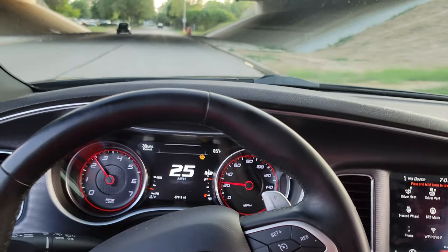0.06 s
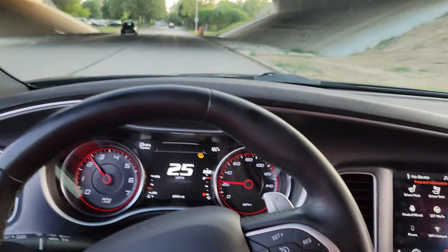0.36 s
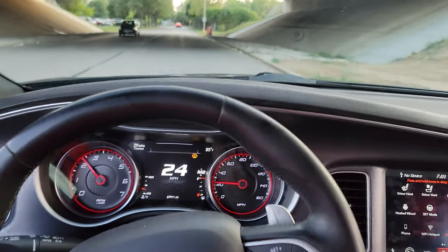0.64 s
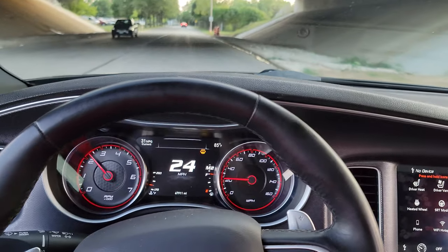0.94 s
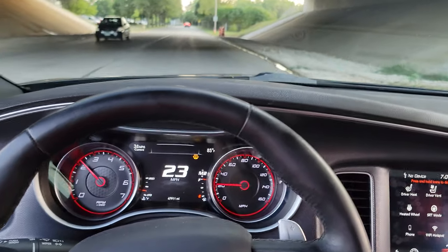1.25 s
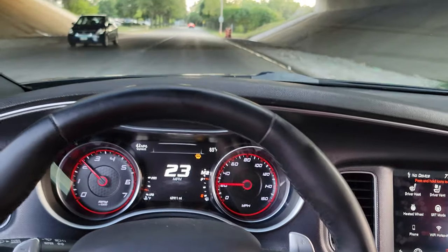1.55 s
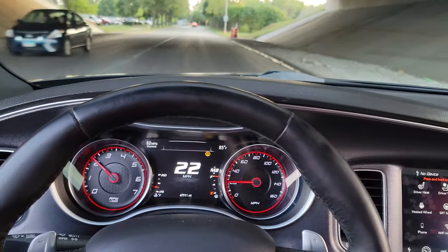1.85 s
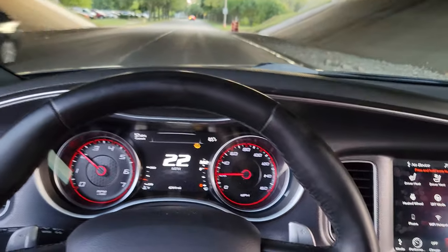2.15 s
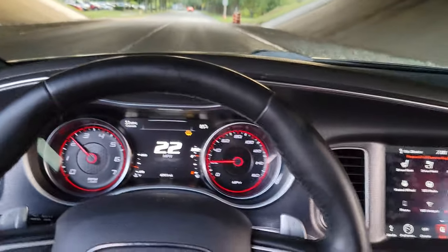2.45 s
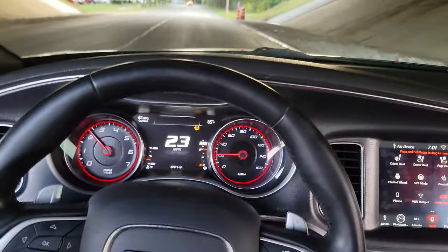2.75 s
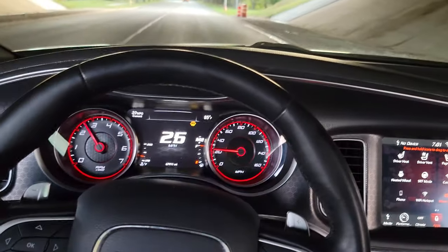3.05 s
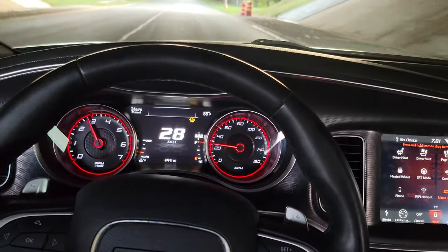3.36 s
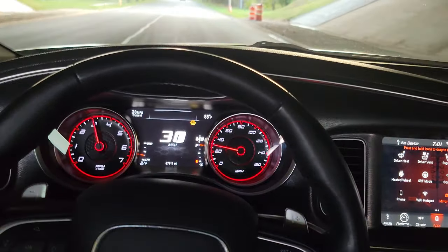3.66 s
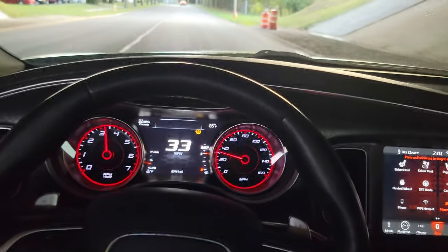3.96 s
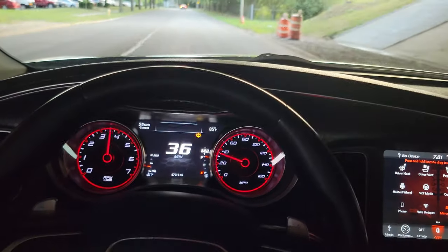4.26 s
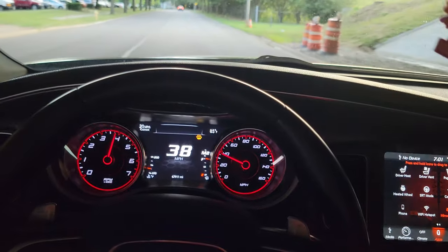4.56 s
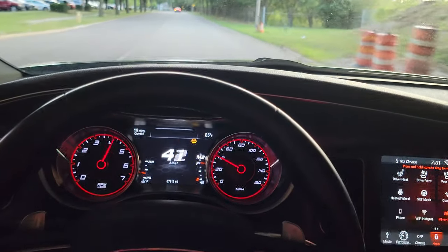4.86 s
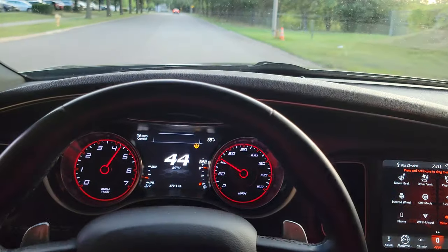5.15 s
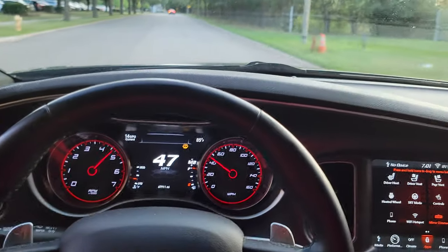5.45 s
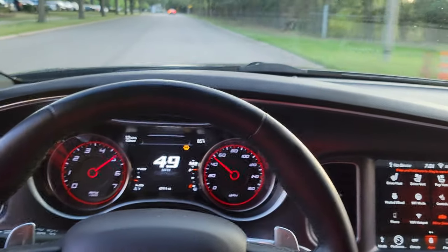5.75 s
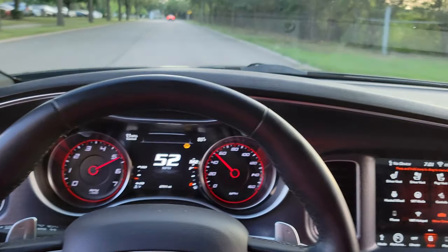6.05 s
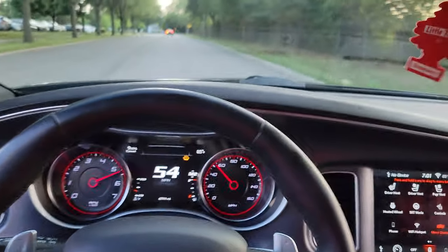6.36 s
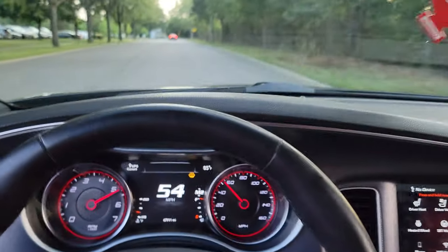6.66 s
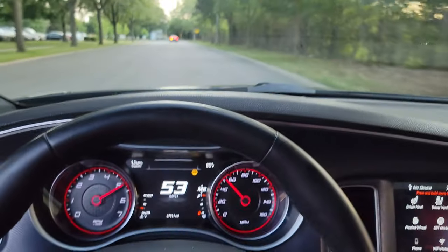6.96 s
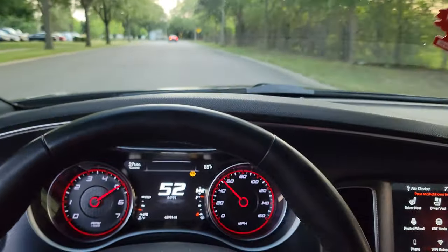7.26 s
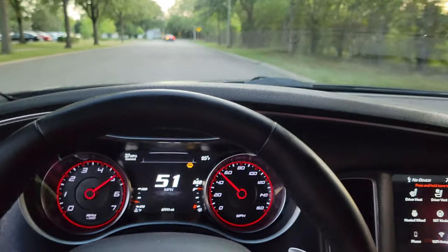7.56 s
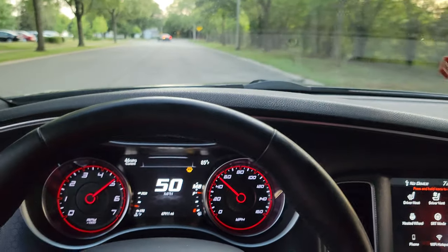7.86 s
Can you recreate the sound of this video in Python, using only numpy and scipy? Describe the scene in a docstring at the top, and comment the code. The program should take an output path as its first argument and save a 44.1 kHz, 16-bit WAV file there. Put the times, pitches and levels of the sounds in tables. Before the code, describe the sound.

From the driver's seat, exhaust pops give way to a rising engine roar, followed by another burst of bangs and a high drone.

```python
"""Inside a loud V8 saloon

The car coasts under a bridge, popping, with one cylinder chuffing. It pulls with a rough growl from 2400
to 5400 rpm, then lifts off with more bangs and a high drone. The firing cylinders make the engine's note;
the exhaust's pops shake the cabin trim into a short buzz. The road rumbles underneath."""
import sys
import numpy as np
from scipy import signal
from scipy.fft import rfft, irfft, next_fast_len
from scipy.io import wavfile

SR = 44100
rng = np.random.default_rng(int(sys.argv[2]) if len(sys.argv) > 2 else 0)


def materialize(psi):
    """Save the field psi as 16-bit PCM at rate SR to the path in sys.argv[1].

    A 1-D psi becomes a single channel; in a 2-D psi each row is a channel.
    """
    bounded = np.clip(np.atleast_2d(psi).T, -1, 1)
    quanta = np.round(bounded * 32767).astype(np.int16)
    wavfile.write(sys.argv[1], SR, quanta)


N = 348831
TIME = np.arange(N) / SR
SLOW_HZ, FAST_HZ = 63.8, 78.2   # engine speeds between which the note changes over

# engine speed (a coast, a flare, a long pull, a stumble, a slow fall): t/s, crankshaft turns/Hz
ENGINE_SPEED = [(0.0, 41.85), (2.12, 36.06), (2.2, 39.2), (2.3, 41.4), (2.38, 39.0), (2.65, 40.29),
                (3.05, 43.86), (4.55, 66.06), (5.55, 81.3), (6.0, 87.87), (6.15, 89.76), (6.45, 88.95),
                (6.55, 85.73), (6.7, 87.93), (7.0, 85.55), (7.55, 83.85), (7.91, 81.77)]
# the pedal: t/s, throttle (0 shut, 1 open)
PEDAL = [(2.15, 0), (2.33, .15), (2.6, .9), (3.4, 1), (6.47, 1), (6.58, 0)]
# loudness of the exhaust note: t/s, level/dB
NOTE_LEVEL = [(0, -15.5), (2.271, -16), (2.38, -21), (2.65, -11), (3.4, -11), (4.3, -15), (5.1, -14),
              (6.1, -15), (6.5, -18), (7.0, -16.5), (7.91, -15)]
# loudness of the sounds of hard pulling: t/s, growl/dB, bark/dB
LOAD_LEVELS = [(2.3, -55.5, -55), (2.6, -22, -37), (2.85, -20.5, -28.5), (3.3, -19, -24), (4.2, -16.5, -27),
               (5.1, -15.5, -27), (5.6, -21.5, -27.5), (6.0, -22.5, -36), (6.5, -42, -41)]
# exhaust pops, with a few faint chuffs and trim rattles: t/s, level/dB, thump offset/dB, buzz offset/dB
POPS_AND_RATTLES = [(0.038, -15, 1, -36), (0.066, -14, 3, -31), (0.159, -12.5, 1.5, -35),
                    (0.271, -28.5, 1, -43), (0.292, -9, -2, -31), (0.329, -23.5, 13.5, -41),
                    (0.467, -27, 6.5, -41.5), (0.506, -17.5, 5.5, -43), (0.57, -9, 0, -19.5),
                    (0.716, -28.5, 2, -40.5), (0.739, -8, -2, -20.5), (0.765, -15, -9, -42),
                    (0.84, -28, 3.5, -16), (0.863, -22, 9.5, -40), (0.942, -7.5, -2.5, -27),
                    (0.971, -27, -10, -32), (1.043, -30.5, -10, -15), (1.129, -11.5, 2, -24),
                    (1.159, -36.5, -2.5, -14), (1.257, -14, 0, -34), (2.194, -23.5, 11, -50),
                    (6.645, -21, -1.5, -21), (6.722, -20, -2.5, -24), (6.746, -11, -2, -23),
                    (6.8, -11, -5, -24), (6.822, -13, -0.5, -18), (6.842, -17, 0, -24),
                    (6.866, -11.5, -11.5, -22), (6.907, -15, 3, -14), (6.951, -14, -8.5, -25),
                    (7.021, -15.5, -11, -24)]
# tone colours of a crack, rushing air and buzzing trim: f/Hz, level/dB
CRACK_COLOUR = [(200, -2), (350, 2.5), (650, 1), (1000, -1), (1500, -2.5), (2300, -16), (3200, -26.5),
                (7000, -45), (16000, -58.5)]
RUSH_COLOUR = [(1500, 2), (3000, 5.5), (3600, 1.5), (4400, 3), (5500, 1.5), (7200, -2.5), (8300, -14.5),
               (16000, -26.5)]
BUZZ_COLOUR = [(3000, -10), (6000, 4), (8500, -4.5), (10500, -2.5), (12500, 2.5), (16000, 0)]


def from_db(db):
    """Turn decibels into a gain."""
    return 10 ** (np.asarray(db) / 20)


def unit_power(x):
    """Scale a sound to an average power of 1."""
    return x / np.sqrt(np.mean(x ** 2) + 1e-20)


def in_time(rows, t=TIME):
    """Read each column of a table at the times t."""
    s, *columns = np.transpose(rows)
    return [np.interp(t, s, c) for c in columns]


def at_hz(points, hz):
    """Read a table along a logarithmic frequency axis."""
    f, value = np.transpose(points)
    return np.interp(np.log(hz + 1e-3), np.log(f), value)


def drift(rate, t):
    """A smooth random wander of about 1, with up to `rate` swings per unit of t."""
    knots = signal.resample_poly(rng.standard_normal(2000), 8, 1)
    return np.interp(t * rate * 16 + 100, np.arange(len(knots)), knots)


def swells(rows, width_s, t=TIME):
    """Add up bell-shaped swells, given as (t/s, height)."""
    return sum(height * np.exp(-np.minimum(((t - s) / width_s) ** 2, 50)) for s, height in rows)


def lift_db(modes, hz):
    """How many decibels a set of peaks and dips adds at hz."""
    return sum(db / (1 + (2 * (hz - f) / width) ** 2) for f, width, db in modes)


def ring(x, hz, t60):
    """A resonance: each click in x starts a tone that fades by 60 dB in t60 seconds."""
    r, w = np.exp(-np.log(1000) / (t60 * SR)), 2 * np.pi * hz / SR
    return signal.lfilter([0, np.sin(w)], [1, -2 * r * np.cos(w), r * r], x + 1e-18)


def pipe_ring(x, hz, width, db):
    """One resonance of a pipe: the narrower it is, the longer it rings."""
    return from_db(db) * np.sqrt(width) * ring(x, hz, np.log(1000) / (np.pi * width))


def keep_band(x, low_hz, high_hz):
    """Let through what lies between two frequencies."""
    return signal.sosfilt(signal.butter(2, [low_hz, high_hz], "band", fs=SR, output="sos"), x)


def cabin(x, colour=None):
    """Standing waves make left and right differ. Rows of x: direct sound, left echoes, right echoes."""
    # how far the left side is ahead: f/Hz, phase/rad
    left_lead = [(60, 0.39), (130, 0), (260, 0.98), (370, 1), (470, 2.88), (580, 2.16), (630, 2.2),
                 (675, 1.0), (730, 2.1), (850, 2.34), (1080, 3), (1720, 2.92), (2400, 7), (5000, 13.9),
                 (16000, 49.66)]
    # how much both sides have in common: f/Hz, share (0-1)
    common_share = [(60, 0.95), (150, 0.9), (380, 0.54), (600, 0.83), (1200, 0.82), (2400, 0.47),
                    (5000, 0.074), (16000, 0.063)]
    # how much louder the left side is: f/Hz, level/dB
    left_louder = [(60, -2), (200, 0.2), (600, 3), (1300, -2), (2400, -5), (4400, 1), (8000, 8.5),
                   (15000, -1)]
    size = next_fast_len(N + SR // 10)
    hz, spectrum = np.arange(size // 2 + 1) * SR / size, rfft(x, size)
    shared = np.clip(at_hz(common_share, hz), 0, 1)
    spectrum = np.sqrt(shared) * spectrum[0] + np.sqrt(1 - shared) * spectrum[1:]
    if colour:
        spectrum = spectrum * from_db(at_hz(colour, hz))
    sides = np.array([[.5], [-.5]])
    phase_shift = np.exp(1j * sides * at_hz(left_lead, hz))
    return irfft(spectrum * phase_shift * from_db(sides * at_hz(left_louder, hz)), size)[:, :N]


def cabin_noise(colour):
    """Stereo noise of a given tone colour in the cabin, at power 1."""
    return unit_power(cabin(rng.standard_normal((3, N)), colour))


def roughness(t):
    """The engine burns most unevenly in the middle of the pull, and around the pops."""
    # with the throttle shut and open: crankshaft turns/Hz, roughness (0-1)
    rough_shut = [(38, .16), (84, .08)]
    rough_open = [(40, .27), (60, .4), (77, .44), (86, .18)]
    crank, throttle = in_time(ENGINE_SPEED, t)[0], in_time(PEDAL, t)[0]
    shut, opened = (np.interp(crank, *np.transpose(table)) for table in (rough_shut, rough_open))
    near_pop = np.minimum(swells([(s, 1) for s, *_ in POPS_AND_RATTLES], width_s=.12, t=t), 1)
    return (1 - throttle) * shut + throttle * opened + .1 * near_pop


def puffs(firing, depth, scatter_db):
    """Gas leaves in a puff at each firing, stronger from some cylinders."""
    # strength of each of the eight firings: level/dB
    cylinder_db = [1.2, -1, .3, -.4, 1, -1.2, 0, -.5]
    number = firing.astype(int)
    strength = np.array(cylinder_db)[number % len(cylinder_db)]
    strength = strength + scatter_db * rng.standard_normal(N)[number]
    return unit_power(from_db(strength) * np.exp(depth * np.cos(2 * np.pi * (firing - .5))))


def exhaust_note(turns, boom_db=-2.0, boom_edge_hz=100, wobble_hz=12.0, sway_db=.8, misfire_db=-2.5):
    """The firings make a stack of tones ("orders"), mixed by throttle and speed, wobbling unevenly."""
    # the tones in four running states: order (multiple of the engine speed), level/dB
    shut_slow = [(1.0, -35), (1.5, -34), (2.0, -28), (2.5, -37), (3.0, -19.5), (3.5, -30), (4.0, -20),
                 (4.5, -33), (5.0, -29), (5.5, -29), (6.0, -44), (6.5, -39), (7.0, -36), (7.5, -38),
                 (8.0, -38), (8.5, -36), (9.0, -40), (9.5, -40), (10.0, -40), (10.5, -43), (11.0, -44),
                 (11.5, -42), (12.0, -44), (12.5, -37), (13.0, -47), (13.5, -43), (14.0, -45)]
    open_slow = [(1.0, -29), (1.5, -33), (2.0, -25), (2.5, -28), (3.0, -26), (3.5, -27), (4.0, -20),
                 (4.5, -25), (5.0, -27), (5.5, -30), (6.0, -33), (6.5, -30), (7.0, -31), (7.5, -30),
                 (8.0, -31), (8.5, -36), (9.0, -33), (9.5, -39), (10.0, -39), (10.5, -39), (11.0, -37),
                 (11.5, -35), (12.0, -32), (12.5, -39), (13.0, -44), (13.5, -45), (14.0, -46)]
    open_fast = [(1.0, -18), (1.5, -29), (2.0, -32), (2.5, -20), (3.0, -28), (3.5, -25), (4.0, -22),
                 (4.5, -26), (5.0, -23), (5.5, -27), (6.0, -32), (6.5, -37), (7.0, -38), (7.5, -37),
                 (8.0, -44), (8.5, -41), (9.0, -43), (9.5, -37), (10.0, -40), (10.5, -43), (11.0, -45),
                 (11.5, -42), (12.0, -46), (12.5, -36), (13.0, -39), (13.5, -45), (14.0, -42), (14.5, -43),
                 (15.0, -48)]
    shut_fast = [(1.0, -23), (1.5, -22), (2.0, -30), (2.5, -32), (3.0, -28), (3.5, -34), (4.0, -18),
                 (4.5, -34), (5.0, -26), (5.5, -24), (6.0, -35), (6.5, -37), (7.0, -32), (7.5, -39),
                 (8.0, -26.5), (8.5, -30), (9.0, -39), (9.5, -29), (10.0, -32), (10.5, -37), (11.0, -29),
                 (11.5, -44), (12.0, -43), (12.5, -36), (13.0, -50), (13.5, -45), (14.0, -32), (14.5, -45),
                 (15.0, -44), (15.5, -42), (16.0, -43), (16.5, -43), (17.0, -42), (17.5, -39), (18.0, -35),
                 (18.5, -43)]
    # peaks and dips that the tones sweep through: f/Hz, width/Hz, level/dB
    cabin_air = [(126.3, 17.7, 5), (203.2, 12.7, 5)]   # at any load
    drones = [(135, 13, 6), (199, 13, 4), (283, 22, 5), (325, 35, 4), (362, 26, 10), (392, 26, 12),
              (455, 50, -2), (555, 70, 5)]   # pulling at low speed
    body_modes = [(55, 22, -4), (83.2, 16, 0.5)]   # the car's body, under load
    firing_open = [(160, 10, 4), (171, 10, -8), (215, 40, 1), (300, 20, 2), (355, 50, -4)]   # standing waves for the firing tone, throttle open
    firing_shut = [(148, 16, 2), (166, 12, -4), (344, 36, 6)]   # and throttle shut
    # tones that swell or soften at high engine speed: f/Hz, width/Hz, level/dB
    high_speed_colour = [(310, 24, 6), (445, 40, -3), (536, 26, 13), (675, 30, 4), (805, 40, -4),
                         (1122, 26, 19)]
    # the drivetrain lurches and the boom swells as the throttle opens and shuts: t/s, level/dB
    lurches = [(2.2, 6), (6.51, 11)]
    step = 12   # low tones need only every 12th sample
    t, turns = TIME[::step], turns[::step]
    crank, throttle, note_db = (in_time(curve, t)[0] for curve in (ENGINE_SPEED, PEDAL, NOTE_LEVEL))
    rough, lurch_db = roughness(t), swells(lurches, width_s=.04, t=t)
    fast = np.clip((crank - SLOW_HZ) / (FAST_HZ - SLOW_HZ), 0, 1)
    slow, shut = 1 - fast, 1 - throttle
    # tones, firing tone level/dB, share of the mix
    states = [(shut_slow, -20, shut * slow), (open_slow, -17.5, throttle * slow),
              (open_fast, -20.5, throttle * fast), (shut_fast, -23, shut * fast)]
    orders = np.arange(2, 38) / 2
    hz = orders[:, None] * crank
    level = sum(np.interp(orders, *np.transpose(table), right=-50)[:, None] * share
                for table, _, share in states)
    level += lift_db(cabin_air, hz) + slow * throttle * lift_db(drones, hz)
    level += fast * lift_db(high_speed_colour, hz)
    # the lowest tones boom through the body, the rest come down the pipe
    low = 1 / (1 + (hz / boom_edge_hz) ** 20)
    body = low * from_db(level + boom_db + throttle * lift_db(body_modes, hz) + lurch_db)
    pipe = (1 - low) * from_db(level)
    gains = body + from_db(note_db) * pipe / np.sqrt(np.sum(pipe ** 2, axis=0))
    out = 0
    for order, order_hz, gain in zip(orders, hz, gains):
        # under load, scatter in the firing times blurs the higher tones most
        uneven = np.minimum(rough * (1 + throttle * order / 10), .95)
        if order == 4:
            # the firing tone: all cylinders add up, so it is steadier, but each pop robs it briefly
            standing = throttle * lift_db(firing_open, order_hz) + shut * lift_db(firing_shut, order_hz)
            misfires = swells([(s, misfire_db) for s, *_ in POPS_AND_RATTLES], width_s=.045, t=t)
            gain = from_db(sum(db * share for _, db, share in states) + standing + misfires - lurch_db)
            uneven = rough / 2
        blur_hz = wobble_hz * max(1, order / 4)
        blur = (drift(blur_hz, t) + 1j * drift(blur_hz, t)) / np.sqrt(2)
        wobble = np.sqrt(1 - uneven ** 2) + uneven * blur
        sway = from_db(sway_db * drift(1.493, t))
        wave = np.sqrt(2) * gain * sway * wobble * np.exp(2j * np.pi * (order * turns + rng.random()))
        # echoes come a quarter cycle off and slowly change in strength
        echoes = np.sqrt(2) * np.sin(2 * np.pi * rng.random((2, 1)) + drift(0.703, t)) * wave.imag
        out = out + np.vstack([wave.real, echoes])
    return cabin(signal.resample_poly(out, step, 1, axis=1)[:, :N])


def burble(firing, level_db=-1.5):
    """No two firings are equal: their scatter rings the pipe between the engine's tones."""
    # resonances of the exhaust pipe: f/Hz, width/Hz, level/dB
    pipe_modes = [(120.7, 28, -2), (196.4, 53, 6), (265, 55, -18), (336, 62, 4), (374, 50, -1),
                  (544, 16, -9)]
    kicks = np.diff(np.floor(firing), prepend=0) * rng.standard_normal((3, N))
    pipe = sum((-1) ** k * pipe_ring(kicks, *mode) for k, mode in enumerate(pipe_modes))
    pipe = unit_power(keep_band(pipe, 90, 700))
    return cabin(pipe * roughness(TIME) * from_db(in_time(NOTE_LEVEL)[0] + level_db))


def roar(turns, firing, chuff_db=9.5, chuff_s=.009, surge_db=1.0, surge_hz=28):
    """Gas tears out in puffs: one cylinder's chuff on the coast, a surging bark and rasp under load."""
    # loudness of the rasp: t/s, level/dB
    rasp_level = [(1.25, -41.5), (1.5, -43.5), (2.05, -43), (2.3, -38.5), (2.55, -35.5), (3.0, -33),
                  (3.85, -29.5), (4.8, -25.5), (5.45, -25.5), (6.5, -34), (6.85, -30), (7.03, -29),
                  (7.2, -31.5), (7.7, -29), (7.91, -30)]
    # its tone colour: f/Hz, level/dB
    rasp_colour = [(300, -8), (520, -2.5), (720, -6), (1050, 0.5), (1350, -7.5), (1700, -4), (2050, -13),
                   (2450, -15), (2850, -20), (3400, -28), (6000, -53.5)]
    # resonances of the tailpipes: f/Hz, width/Hz, level/dB
    bark_modes = [(560, 31, 7.5), (780, 70, 1.5), (870, 88, 7), (1036, 54, 7), (1560, 150, -26),
                  (2000, 250, -33)]
    crank, throttle = in_time(ENGINE_SPEED)[0], in_time(PEDAL)[0]
    coasting = (1 - throttle) * (crank < SLOW_HZ)
    age = (turns / 2 - .64) % 1 * 2 / crank   # seconds since the chuff, which comes every two turns
    chuff = coasting * from_db(chuff_db) * (1 - np.exp(-age / .001)) * np.exp(-age / chuff_s)
    gas = puffs(firing, depth=.17, scatter_db=.7)
    rasp = gas * cabin_noise(rasp_colour) + chuff * cabin_noise(CRACK_COLOUR)
    rasp *= from_db(in_time(rasp_level)[0] + 6.5)
    blasts = rng.standard_normal((3, N)) * puffs(firing, depth=.5, scatter_db=1.2)
    pipes = sum(np.diff(pipe_ring(blasts, hz, width, db), prepend=0) / hz for hz, width, db in bark_modes)
    bark = from_db(in_time(LOAD_LEVELS)[1]) * unit_power(cabin(keep_band(pipes, 450, 2400)))
    return (rasp + bark) * from_db(throttle * surge_db * drift(surge_hz, TIME))


def road_rumble():
    """The road rumbles deeply under the car."""
    # loudness: t/s, level/dB
    road_level = [(0.0, -46), (0.8, -29.5), (1.6, -27.5), (2.4, -22.5), (3.5, -30), (5.1, -24),
                  (6.1, -20.5), (7.91, -20)]
    # tone colour: f/Hz, level/dB
    road_colour = [(12, -31.5), (25, -3), (32, 5.5), (40, 2), (50, -3.5), (65, 3), (110, -12), (300, -11.5),
                   (700, -26.5), (2000, -68.5)]
    return from_db(in_time(road_level)[0] + 1.0) * cabin_noise(road_colour)


def air_rush(firing):
    """Rushing air hisses, pulsing a little with each firing."""
    # loudness: t/s, level/dB
    rush_level = [(1.5, -57.5), (2.25, -56.5), (2.75, -51.5), (4.25, -48.5), (4.8, -39), (5.38, -34.5),
                  (5.6, -38), (6.0, -39.5), (6.55, -48), (6.9, -41), (7.3, -40.5), (7.75, -37.5),
                  (7.91, -39)]
    hiss = from_db(in_time(rush_level)[0] + 4.5) * cabin_noise(RUSH_COLOUR)
    return hiss * puffs(firing, depth=.085, scatter_db=1.8) ** .5


def pops(snap_db=-12, crack_db=-6.0, tail_db=-30.5, buzz_db=-4.0, tap_db=3.0):
    """Pops crack, thump the pipe and body, then shake the trim; faint ones are chuffs or rattles."""
    # what a thump rings with: f/Hz, level/dB, time to fade by 60 dB/s
    thump_modes = [(64, -0.5, 0.24), (95.3, 3.5, 0.11), (183, 3, 0.038), (234, -1, 0.042),
                   (324.8, -5.5, 0.11), (354, -9, 0.072), (560, -4, 0.045), (640, -15.5, 0.019),
                   (1082, -1, 0.043)]
    # tone colour of a pop's first, direct snap: f/Hz, level/dB
    snap_colour = [(300, -5), (650, 8), (1300, 5.5), (2200, 0), (3200, -25), (6000, -38), (16000, -65)]
    snap_s, crack_rise_s, crack_t60, tail_t60 = .008, .0015, .12, .25
    hold_s = .007   # the crack stays strong while its first echoes arrive
    buzz_rise_s, buzz_length_s, taps_per_s, tap_s = .011, .037, 130, .002
    crack, snap, buzz, kicks = np.zeros((4, N))
    for s, db, thump, rattle in POPS_AND_RATTLES:
        start = int(s * SR)
        age = TIME[:N - start][:SR // 2]
        span = slice(start, start + len(age))
        dying = from_db(-60 * np.maximum(age - hold_s, 0) / crack_t60)
        tail = from_db(tail_db - 60 * age / tail_t60)
        crack[span] += from_db(db) * (1 - np.exp(-age / crack_rise_s)) * (dying + tail)
        snap[span] += from_db(db + snap_db) * np.exp(-age / snap_s)
        shake = (1 - np.exp(-age / buzz_rise_s)) / (1 + (age / buzz_length_s) ** 10)
        buzz[span] += from_db(db + rattle) * shake
        kicks[start] = from_db(db + thump)
    # the thump is mostly direct; its echoes differ each time
    kicks = kicks * np.vstack([np.ones(N), rng.choice([-1, 1], (2, N))])
    thumps = sum(from_db(db) * ring(kicks, hz, t60) for hz, db, t60 in thump_modes)
    # the trim taps at random, each tap dying quickly
    taps = signal.lfilter([1], [1, -np.exp(-1 / (tap_s * SR))], rng.random(N) < taps_per_s / SR)
    chatter = unit_power(1 + from_db(tap_db) * taps)
    burst = snap * cabin_noise(snap_colour) + from_db(crack_db) * crack * cabin_noise(CRACK_COLOUR)
    trim = from_db(buzz_db) * buzz * chatter * cabin_noise(BUZZ_COLOUR)
    return burst + cabin(keep_band(thumps, 40, 800)) + trim


def settling(rattle_db=-39.5, hiss_db=-32.0, settle_t60=0.97, rise_s=0.058):
    """The pops leave the trim trembling and gas hissing in the pipe; both die away slowly."""
    power = np.zeros(N)
    for s, db, *_ in POPS_AND_RATTLES:
        start = int(s * SR)
        age = TIME[:N - start][:SR]
        shaken = from_db(db - 60 * age / settle_t60) * (1 - np.exp(-age / rise_s))
        power[start:start + len(age)] += shaken ** 2
    trembling = from_db(rattle_db) * cabin_noise(BUZZ_COLOUR)
    return np.sqrt(power) * (trembling + from_db(hiss_db) * cabin_noise(RUSH_COLOUR))


def hand_on_wheel():
    """A hand slides on the steering wheel with a short swish."""
    # loudness: t/s, level/dB
    hand_level = [(0, -95), (.34, -71), (.41, -48), (.47, -49), (.56, -58), (.7, -90)]
    # tone colour: f/Hz, level/dB
    swish_colour = [(4000, -31), (5200, -15.5), (5600, 5), (6500, 0), (7500, -17), (10000, -50)]
    return from_db(in_time(hand_level)[0]) * cabin_noise(swish_colour)


def panel_slaps(decay_s=.006):
    """After the hardest pops a loose panel falls back into its seat with a bright snap."""
    # each slap: t/s, level/dB
    slap_times = [(0.593, -29), (0.766, -26.5), (0.979, -33)]
    # tone colour: f/Hz, level/dB
    slap_colour = [(2500, -15), (4800, 2), (6500, -4), (9000, -8), (13000, 4), (16000, 3)]
    level = np.zeros(N)
    for s, db in slap_times:
        start = int(s * SR)
        level[start:] += from_db(db) * np.exp(-np.minimum(TIME[:N - start] / decay_s, 20))
    return level * cabin_noise(slap_colour)


def wheeze():
    """A thin wheeze comes and goes."""
    # each wheeze: t/s, half length/s, level/dB
    wheeze_times = [(1.1, .22, -42), (2.315, .02, -33), (2.43, .1, -40), (7.0, .11, -32)]
    # tone colour: f/Hz, level/dB
    wheeze_colour = [(900, -20), (1600, -1), (1950, 0), (2600, -9), (3500, -25), (8000, -50)]
    level = sum(swells([(s, from_db(db))], width_s) for s, width_s, db in wheeze_times)
    return level * cabin_noise(wheeze_colour)


def growl(turns, edge_hz=425, firmness=.7):
    """Under load, uneven firing smears the note into rough bands that climb with the engine speed."""
    # the bands: centre/order, half width/order, level/dB
    growl_bands = [(2.15, .25, -7), (3.76, .16, -1), (3.45, .4, -9), (4.8, .18, -3), (6.9, .5, -10),
                   (7.72, .1, -5)]
    # the cabin's standing waves that lift them: f/Hz, width/Hz, level/dB
    growl_modes = [(285, 30, 3), (345, 30, 1), (392, 36, 8)]
    step = 12   # low tones need only every 12th sample
    turns, crank = turns[::step], in_time(ENGINE_SPEED, TIME[::step])[0]
    out = np.zeros((3, len(turns)))
    for order, width, db in growl_bands:
        hz = order * crank
        # the cabin shuts out the growl above edge_hz
        gain = from_db(db + lift_db(growl_modes, hz)) / (1 + (hz / edge_hz) ** 24)
        tone = gain * np.exp(2j * np.pi * order * turns)
        for part in out:
            wander = drift(width, turns) + 1j * drift(width, turns)
            part += (tone * wander / (abs(wander) + .2) ** firmness).real   # firmness evens the strength
    bands = cabin(signal.resample_poly(out, step, 1, axis=1)[:, :N])
    return from_db(in_time(LOAD_LEVELS)[0]) * unit_power(bands)


def intake_hiss(at_s=2.64, level_db=-43):
    """Air hisses in as the throttle opens."""
    hiss = unit_power(cabin_noise(RUSH_COLOUR) + cabin_noise(BUZZ_COLOUR))
    return swells([(at_s, from_db(level_db))], width_s=.065) * hiss


def trim_buzz():
    """The cabin trim buzzes, mostly at high engine speed."""
    # loudness: t/s, level/dB
    buzz_level = [(1.5, -84), (2.15, -85), (2.5, -66), (2.95, -57.5), (3.3, -59), (4.45, -59), (4.75, -50),
                  (5.15, -53), (5.33, -42), (5.6, -53), (5.95, -47.5), (6.5, -58), (6.8, -42.5),
                  (7.6, -43.5), (7.91, -52)]
    return from_db(in_time(buzz_level)[0] + 6.5) * cabin_noise(BUZZ_COLOUR)


def scene():
    """Engine, exhaust and road as heard from the driver's seat."""
    turns = np.cumsum(in_time(ENGINE_SPEED)[0]) / SR
    firing = 4 * turns   # four cylinders fire in each turn
    background = air_rush(firing) + trim_buzz() + intake_hiss() + wheeze() + road_rumble()
    background += hand_on_wheel()
    engine = exhaust_note(turns) + growl(turns) + burble(firing) + roar(turns, firing)
    return background + engine + pops() + panel_slaps() + settling()


def record(dry, cutoff_hz=15900):
    """Round off the loudest peaks and cut the highest treble."""
    rounded = dry / (1 + dry ** 8) ** (1 / 8)
    return signal.sosfilt(signal.ellip(12, .1, 90, cutoff_hz, fs=SR, output="sos"), rounded)


dry = scene()
out = record(dry)
materialize(out)
```